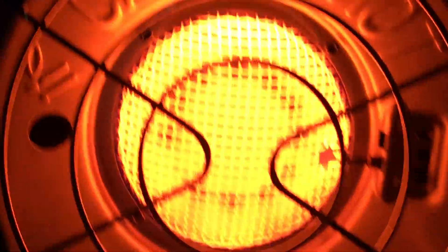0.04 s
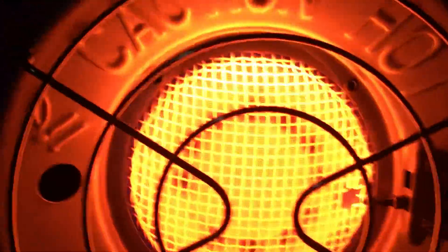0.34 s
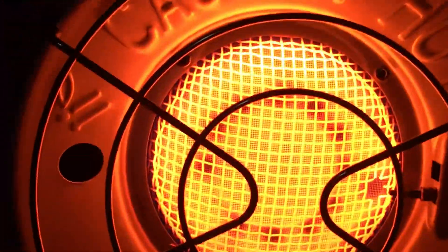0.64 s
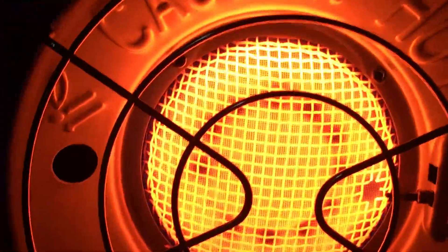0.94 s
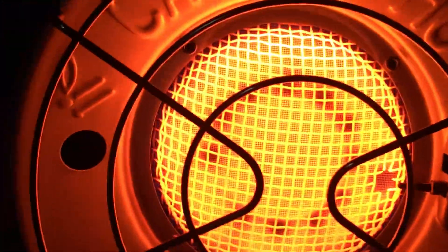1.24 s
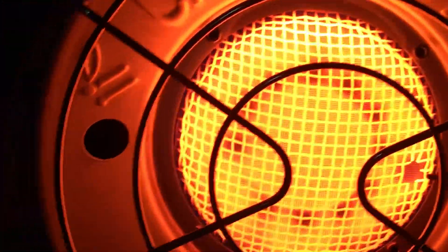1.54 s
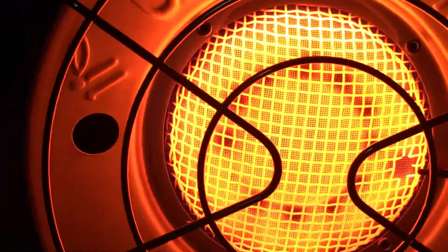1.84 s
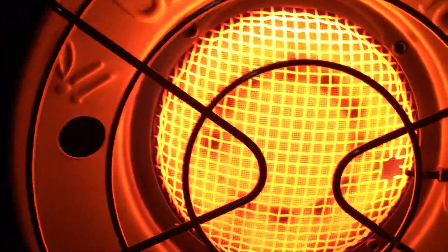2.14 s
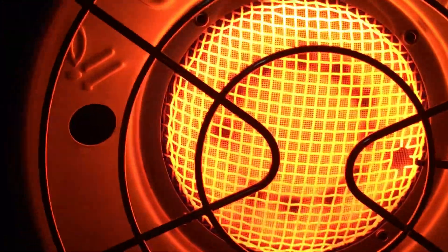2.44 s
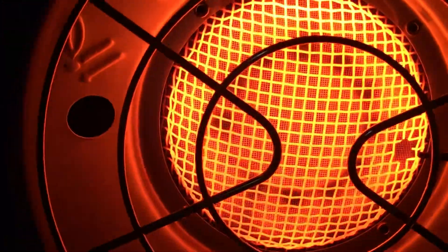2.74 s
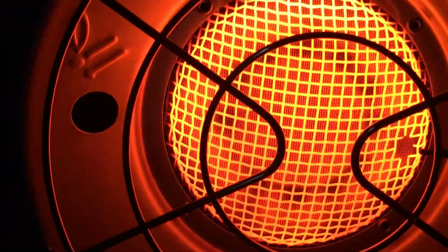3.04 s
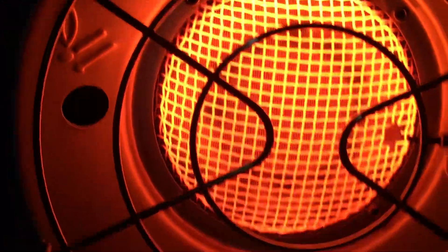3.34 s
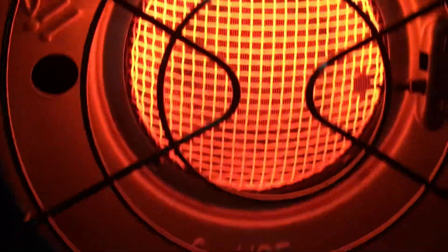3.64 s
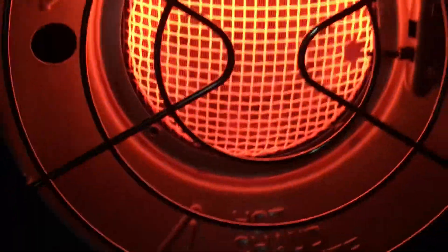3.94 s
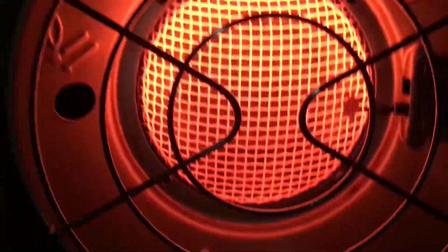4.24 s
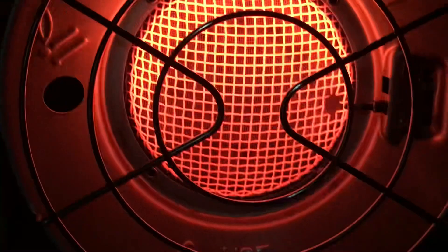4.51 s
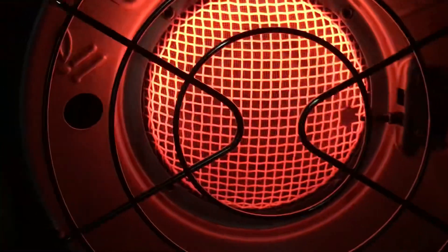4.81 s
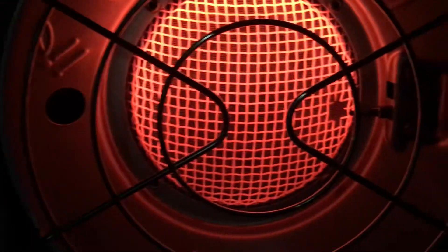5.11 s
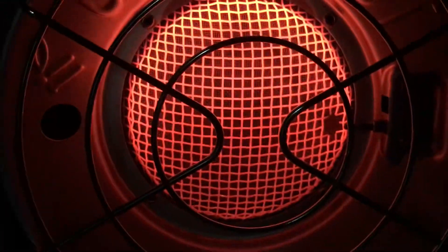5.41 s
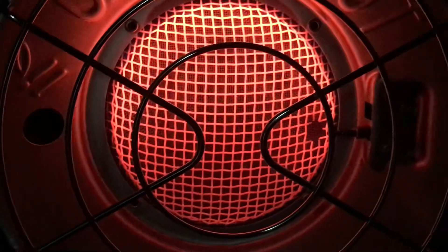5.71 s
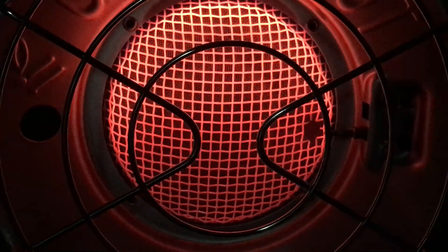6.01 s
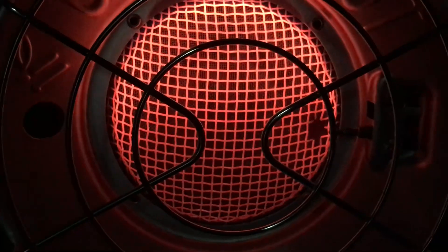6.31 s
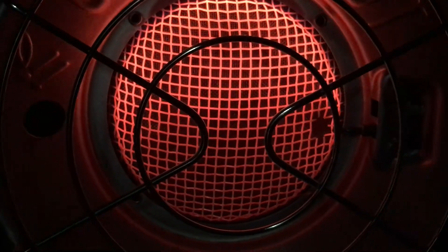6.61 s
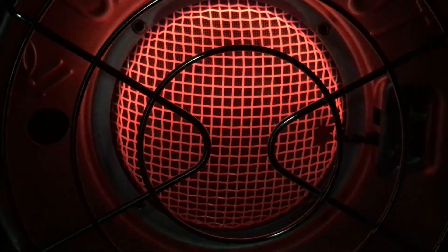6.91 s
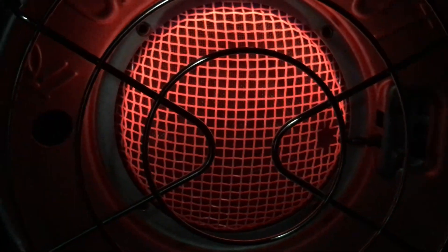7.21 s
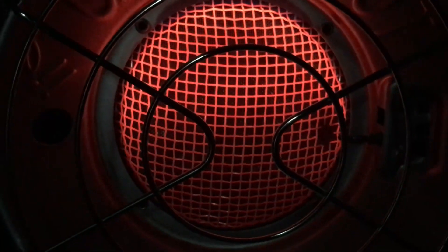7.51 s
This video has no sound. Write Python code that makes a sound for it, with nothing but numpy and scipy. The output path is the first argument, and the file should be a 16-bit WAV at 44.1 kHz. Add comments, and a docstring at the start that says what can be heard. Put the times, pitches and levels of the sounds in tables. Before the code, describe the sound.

A close gas heater burns steadily until a valve snaps shut; the flame flutters out, leaving irregular metallic ticks and crackles.

```python
"""A radiant propane heater, close to one microphone in a small room, burning and then shut off.
The flame roars and putters while the gas jet hisses in its mixing tube. The valve clicks shut, the gas
runs out and the flame flutters away. The hot mesh and reflector then shrink, slipping in ticks and
pings that ring the sheet metal. Behind the heater lie a low room hum and a faint distant rush."""
import sys
import numpy as np
from scipy import signal
from scipy.fft import rfft, irfft, next_fast_len
from scipy.io import wavfile

SR = 44100
rng = np.random.default_rng(int(sys.argv[2]) if len(sys.argv) > 2 else 0)


def output_pcm(signal):
    """Save a mono or channel-first signal as 16-bit PCM at the path in sys.argv[1].

    Samples are clipped to [-1, 1] before scaling.
    """
    pcm = np.clip(np.atleast_2d(signal).T, -1, 1) * 32767
    wavfile.write(sys.argv[1], SR, np.round(pcm).astype(np.int16))


N = 337806
TIME = np.arange(N) / SR
SHUT_S, FLAME_OUT_S = 2.165, 2.421  # the flame briefly outlives the closing of the valve


def undb(db):
    """Decibels to gain."""
    return 10 ** (np.asarray(db) / 20)


def since(s):
    """Seconds gone by since time s, 0 before it."""
    return np.maximum(TIME - s, 0)


def curve(table):
    """Rows of (t/s, value) joined at every sample."""
    return np.interp(TIME, *np.transpose(table))


def contour(points, hz):
    """Rows of (f/Hz, value) joined on a log-frequency axis."""
    at, value = np.transpose(points)
    return np.interp(np.log(np.maximum(hz, 1)), np.log(at), value)


def bins(size):
    """Frequencies in the spectrum of a sound of size samples."""
    return np.fft.rfftfreq(size, 1 / SR)


def resonance(hz, centre_hz, width_hz):
    """Magnitude response of one resonance, 1 at its centre."""
    return abs(1j * hz * width_hz / (centre_hz ** 2 - hz ** 2 + 1j * hz * width_hz))


def bumps(table, hz):
    """Rounded peaks and dips in dB from rows of (f/Hz, width/Hz, boost/dB)."""
    return sum(db * resonance(hz, f, width) ** 2 for f, width, db in table)


def unit(x):
    """Scale to rms 1."""
    return x / np.sqrt(np.mean(x ** 2))


def noise(response):
    """Steady noise of rms 1 with the given response over frequency."""
    size = next_fast_len(N, True)
    spectrum = rfft(rng.standard_normal(size)) * response(bins(size))
    return unit(irfft(spectrum, size)[:N])


def band(centre_hz, width_hz):
    """One band of noise, rms 1."""
    return noise(lambda hz: resonance(hz, centre_hz, width_hz) ** 2)


def walk(rate_hz):
    """Smooth random wandering with a spread near 1."""
    return noise(lambda hz: np.exp(-(hz / rate_hz) ** 2))


def bell(t, spread):
    """Gaussian swell, 1 at t = 0."""
    return np.exp(-.5 * (t / spread) ** 2)


def fade(t, t60):
    """Exponential decay, 60 dB down after t60."""
    return np.exp(-np.log(1000) * t / t60)


def colour(x, db):
    """Causal filter with the given dB per bin, so that attacks stay sharp."""
    cepstrum = irfft(np.log(undb(db)))
    cepstrum[1:len(x) // 2] *= 2
    cepstrum[len(x) // 2 + 1:] = 0
    return irfft(rfft(x) * np.exp(rfft(cepstrum)))


def add(out, s, sound):
    """Mix a sound in at time s."""
    start = max(int(s * SR), 0)
    part = sound[:max(N - start, 0)]
    out[start:start + len(part)] += part


def putter(rate_hz=23.47, jitter=.1, level_db=-34, scatter_db=1.9):
    """The flame pops at a loose beat until the valve shuts: rows of (t/s, relative level/dB)."""
    gap, strength = rng.standard_normal((64, 2)).T
    times = (np.cumsum(np.exp(jitter * gap)) - .5) / rate_hz
    return [(s, level_db + scatter_db * luck) for s, luck in zip(times, strength) if s < SHUT_S]


# the flame's roar from close by: f/Hz, relative level/dB
ROAR_SPECTRUM = [(40, -7), (100, 2.5), (140, 2), (185, -1), (320, 1.5), (480, -1.5), (780, -2.5),
                 (1050, -7.5), (2000, -14.5), (3000, -14), (6000, -48), (16000, -71)]
# cavity resonances of the burner bowl: f/Hz, width/Hz, boost/dB
BOWL_MODES = [(305, 25, 4), (385, 22, 5), (483, 22, 6), (583, 24, 5)]
# last gasps of the flame: t/s, relative level/dB
LAST_GASPS = [(2.415, -33), (2.435, -36), (2.496, -36)]
def flame(roar_db=-43.5, flicker_db=2, flare_db=3, flare_s=0.047, dying_db_per_s=86,
          pop_gain_db=2, pop_hz=620, pop_s=0.0011, edge_db=-15):
    """Turbulence roars in the bowl, flares and dies; pockets of gas ignite in short, crisp pops."""
    burn_db = flare_db * np.exp(-abs(TIME - FLAME_OUT_S) / flare_s) - dying_db_per_s * since(FLAME_OUT_S)
    out = noise(lambda hz: undb(contour(ROAR_SPECTRUM, hz) + bumps(BOWL_MODES, hz)))
    out *= undb(roar_db + burn_db + flicker_db * walk(96))
    t, pockets = np.arange(-256, 256) / SR, np.zeros(N)
    for s, db in LAST_GASPS + putter():
        pitch, length, phase = rng.standard_normal(3)
        pocket = undb(db + pop_gain_db) * bell(t, pop_s * np.exp(0.055 * length))
        pop = pocket * np.cos(2 * np.pi * pop_hz * np.exp(.12 * pitch) * t + phase)
        add(out, s + t[0], pop)
        add(pockets, s + t[0], pocket)
    crisp_edges = undb(edge_db) * pockets * band(centre_hz=1400, width_hz=2800)
    return out + crisp_edges


# broad hiss at the nozzle: f/Hz, relative level/dB
HISS_SPECTRUM = [(500, -11), (1100, -32), (1650, -13.5), (2050, -6), (2400, -15), (3300, -28), (3800, -14),
                 (5000, -29), (6200, -27.5), (7000, -23.5), (7700, -32), (8500, -21.5), (12000, -23),
                 (16000, -26)]
# resonances of the mixing tube: f/Hz, width/Hz, relative level/dB
TUBE_MODES = [(1388, 70, 5), (2780, 100, 3), (4130, 130, -7), (4330, 130, -7.5), (5650, 90, -17),
              (8885, 200, -12), (9210, 200, -12), (9920, 220, -16), (11000, 450, -20), (11560, 150, -15),
              (12700, 260, -14), (13520, 260, -16), (14000, 250, -17), (14820, 300, -17), (15450, 220, -17),
              (15700, 110, -15)]
def jet(hiss_db=-45, tube_db=1, flicker_db=1, bleed_db_per_s=90):
    """Gas from the nozzle blows the mixing tube; with the valve shut, pressure and hiss sink away."""
    def response(hz):
        tube_power = sum((undb(db + tube_db) * resonance(hz, f, width) * resonance(hz, f, 6 * width)) ** 2
                         for f, width, db in TUBE_MODES)
        return np.sqrt(tube_power + undb(contour(HISS_SPECTRUM, hz)) ** 2)
    return noise(response) * undb(hiss_db - bleed_db_per_s * since(SHUT_S) + flicker_db * walk(91))


# room tone behind the heater: f/Hz, relative level/dB
RUMBLE_SPECTRUM = [(20, -11), (35, -9), (56, -3.5), (80, -3.5), (125, 1.5), (180, -8.5), (250, -9),
                   (350, -18), (500, -23.5), (1000, -22), (2000, -29), (5000, -50), (16000, -51)]
# swells of the room's low boom: t/s, level/dB
BOOM_LEVELS = [(0, -50.5), (1.3, -53.5), (1.6, -58.5), (3.9, -57.5), (4.35, -52), (5.6, -55), (7.15, -54.5),
               (7.35, -50), (7.66, -51)]
# swells of the room's hum: t/s, relative level/dB
HUM_LEVELS = [(2.7, -56.5), (2.78, -66), (3.78, -54.5), (5.16, -63.5), (6.06, -49.5), (6.21, -64),
              (6.82, -49), (7.62, -60.5), (7.66, -60)]
def room(rumble_db=-54, hum_gain_db=-2, hum_hz=109, waver_hz=0.92):
    """The small room: low rumble, a swelling boom and a wavering hum."""
    rumble = noise(lambda hz: undb(contour(RUMBLE_SPECTRUM, hz))) * undb(rumble_db)
    boom = band(centre_hz=59, width_hz=20) * undb(curve(BOOM_LEVELS))
    hum_phase = 2 * np.pi * np.cumsum(hum_hz + waver_hz * walk(8.6)) / SR
    hum = np.sqrt(2) * np.sin(hum_phase) * undb(hum_gain_db + curve(HUM_LEVELS))
    return rumble + boom + hum


# a rush far from the microphone: f/Hz, relative level/dB
RUSH_SPECTRUM = [(100, -1), (250, 14), (340, -1.5), (600, 0.5), (1000, 1.5), (1700, -2.5), (2600, -14),
                 (6000, -26), (16000, -49)]
def distant_rush(far_db=-72, near_db=-60, nearest_s=6.86, rise_db_per_s=8):
    """A faint rush grows as it draws nearer, then holds its level."""
    level_db = np.maximum(far_db, near_db - rise_db_per_s * np.maximum(nearest_s - TIME, 0))
    return noise(lambda hz: undb(contour(RUSH_SPECTRUM, hz))) * undb(level_db)


def spot_colour(hz, ping_hz, low_db, snap_db):
    """Response in dB of one spot on the metal: each has its own low body, ping and treble snap."""
    tilt_db = contour([(1100, low_db), (1800, 0.5 * low_db), (2900, 0), (5500, 0), (8500, snap_db)], hz)
    ping_db = bumps([(ping_hz, 240, 5)], hz)
    ripple = np.interp(hz / 170, np.arange(256), rng.standard_normal(256))  # a peak or dip every 170 Hz
    depth_db = 3.2 * np.minimum(hz / 3500, 1)  # long waves depend less on the spot
    return tilt_db + ping_db + depth_db * ripple


# diffuse ring of the sheet metal and the room: f/Hz, t60/s, relative level/dB
TAIL_BANDS = [(800, 0.26, -6.5), (1620, 0.13, -2), (3980, 0.21, -10.5), (6840, 0.18, -13),
              (10600, 0.25, -29), (16000, 0.13, -25)]
def diffuse_tail(t):
    """A wash of noise rings on in metal and room, each band dying at its own rate."""
    wash, hz = rfft(rng.standard_normal(len(t))), bins(len(t))
    centres = [row[0] for row in TAIL_BANDS]
    return sum(irfft(wash * np.interp(hz, centres, share)) * undb(db) * fade(t, t60)
               for share, (_, t60, db) in zip(np.eye(len(centres)), TAIL_BANDS))


# ringing modes of the reflector: f/Hz, relative level/dB, t60/s
REFLECTOR_MODES = [(839, 1.5, 0.21), (1123, -5, 0.47), (1153, -11, 0.28), (1208, -9, 0.35),
                   (1423, -5.5, 0.43), (1810, -11, 0.2), (2196, 1.5, 0.15), (2427, -22, 0.14),
                   (2410, -9, 0.28), (3020, -28, 0.21), (3180, 6, 0.12), (3050, -4, 0.36),
                   (3770, -21, 0.053), (3730, -0.5, 0.24), (3520, -14, 0.1), (3860, 7.5, 0.16),
                   (4000, -21, 0.27), (3870, -9, 0.25), (4070, -5, 0.48), (4500, -9, 0.16), (4480, 1, 0.2),
                   (4530, -35, 0.1), (5110, 2, 0.15), (5710, -3.5, 0.31), (6760, 4.5, 0.14)]
def metal_click(body_db, ping_hz, low_db, snap_db, crack_t60, tail_db, ping_db,
                ring_db=None, rise_s=0.0011, peak_db=4.5, peak_t60=0.014):
    """Metal slips or is struck: a crack, a tail, a ping and, given ring_db, the reflector's modes."""
    size = 2 * (len(body_db) - 1)
    t, hz = np.arange(size) / SR, bins(size)
    # the first waves are strongest, before they spread through the sheet
    crack = rng.standard_normal(size) * (fade(t, crack_t60) + undb(peak_db) * fade(t, peak_t60))
    crack *= undb(np.repeat(rng.standard_normal(size // 16), 16))  # 1 dB of roughness
    tail = undb(tail_db) * diffuse_tail(t)
    spot_db = spot_colour(hz, ping_hz, low_db, snap_db)
    attack = 1 - np.exp(-t / rise_s)
    sound = colour((crack + tail) * attack, body_db + spot_db)
    sound += undb(ping_db) * fade(t, t60=0.088) * np.sin(2 * np.pi * ping_hz * t)
    if ring_db is not None:
        for f, db, t60 in REFLECTOR_MODES:
            luck, sign, shift = rng.standard_normal(3)
            gain = np.sign(sign) * undb(ring_db + db + np.interp(f, hz, spot_db) + 4.5 * np.tanh(luck))
            # high modes lie close together: each click wakes a slightly different one
            mode_hz = f * (1 + 0.0122 * shift * (f / REFLECTOR_MODES[-1][0]) ** 2)
            sound += gain * fade(t, t60) * np.sin(2 * np.pi * mode_hz * t)
    return sound


# response of the brass valve body: f/Hz, relative level/dB
VALVE_SPECTRUM = [(150, -14), (600, -2), (1000, 4.5), (1400, 1), (1900, 6), (2400, -3), (3300, 9.5),
                  (4300, -13), (6300, 1.5), (8000, -19), (16000, -31)]
# valve and knob contacts: t/s, relative level/dB, ping f/Hz, low body/dB, snap/dB, rise/s, crack t60/s
VALVE_CONTACTS = [(2.156, -33, 3270, -3, -11, 0.00015, .014), (2.156, -31, 3140, 6.5, 7, .0002, .016),
                  (2.159, -32.5, 6200, 4, -27, 0.00024, 0.023), (2.181, -46, 1410, 20, -7, 0.0027, 0.033),
                  (2.8488, -55.5, 1640, 19.5, -10, 0.0018, 0.068)]
def valve(gain_db=14):
    """Close to the microphone the valve snaps shut in a few quick contacts; a dull knock follows."""
    out, body_db = np.zeros(N), contour(VALVE_SPECTRUM, bins(size=16384))
    for s, db, ping_hz, low_db, snap_db, rise_s, crack_t60 in VALVE_CONTACTS:
        contact = metal_click(body_db, ping_hz, low_db, snap_db, crack_t60, tail_db=-14.5, ping_db=-36,
                              ring_db=-40, rise_s=rise_s, peak_db=-14, peak_t60=0.0012)
        add(out, s, undb(db + gain_db) * contact)
    return out


def flutter(level_db=-48, at_s=2.377, spread_s=0.039, rate_hz=105):
    """Starved of gas, the flame sinks onto the mesh and flutters in quick spits."""
    phase = 2 * np.pi * np.cumsum(rate_hz * np.exp(0.2055 * walk(44))) / SR
    pulses = unit(np.exp(0.92 * np.cos(phase)))
    spits = pulses * band(centre_hz=2400, width_hz=2200)
    return undb(level_db) * spits * bell(TIME - at_s, spread_s)


# broad response of reflector and mesh from close by: f/Hz, relative level/dB
SHELL_SPECTRUM = [(200, -42), (620, -19.5), (850, -14), (2000, -9), (2600, -4), (3600, -0.5), (4500, -1.5),
                  (5700, -5.5), (7600, -7), (9700, -1), (10500, -4), (16000, -5.5)]
# clusters and gaps among the reflector's modes: f/Hz, width/Hz, boost/dB
MODE_CLUSTERS = [(853, 88, 7.5), (1077, 125, 5.5), (1784, 33, 10.5), (2440, 125, 6), (2733, 60, -9),
                 (3795, 86, 6), (4360, 190, 5), (4990, 220, -4), (4700, 90, 1.5), (5770, 120, 6)]
def shell(size):
    """Response of mesh and reflector in dB, for a sound of size samples."""
    return contour(SHELL_SPECTRUM, bins(size)) + bumps(MODE_CLUSTERS, bins(size))


def crackle(count=240, from_s=2.38, for_s=5.3, thinning=1.3, level_db=-53.5, scatter_db=6,
            flurry_at_s=2.55, flurry_s=0.034, flurry_db=9.5, fade_from_s=5.73, fade_db_per_s=6.5):
    """Single wires of the cooling mesh slip and tinkle: a flurry, then rarer and at last fainter."""
    out, body_db = np.zeros(N), shell(size=4096)
    for k, (jitter, strength, pitch, snap) in enumerate(rng.random((count, 4))):
        s = from_s + for_s * ((k + 4 * jitter) / count) ** thinning
        db = level_db + scatter_db * (2 * strength - 1)
        db += flurry_db * bell(s - flurry_at_s, flurry_s)
        db -= fade_db_per_s * max(s - fade_from_s, 0)
        tinkle = metal_click(body_db, ping_hz=3500 + 3800 * pitch, low_db=-1.5, snap_db=5 * snap,
                             crack_t60=0.069, tail_db=4.5, ping_db=-8.5)
        add(out, s, undb(db) * tinkle)
    return out


# loud cooling ticks, close to the microphone: t/s, relative level/dB, ping f/Hz, low body/dB, snap/dB
COOLING_TICKS = [(2.409, -48.5, 2570, 14, -2), (2.511, -49, 4280, 5, -3), (2.5187, -43.5, 4330, 1, -5),
                 (2.633, -47.5, 3840, -1, 3), (2.661, -47, 3760, -5, 2), (2.6742, -41.5, 2930, 4.5, 6),
                 (2.7410, -46, 4230, -4, 1), (2.7815, -37.5, 3450, 3, -2.5), (2.8359, -44.5, 3600, 2, 7),
                 (2.8761, -41, 3750, 1, 0.5), (2.929, -47, 4250, -5, -4), (2.9717, -44, 3760, 5, -6.5),
                 (3.0573, -44.5, 3830, -2, -10), (3.0927, -42.5, 3920, -6, 0), (3.102, -42, 3830, 1, 0),
                 (3.1218, -42.5, 3690, 4, 1), (3.2298, -34.5, 3810, 3, -3.5), (3.3556, -49.5, 3960, 5, 3),
                 (3.3708, -41, 3810, 2, -0.5), (3.44, -38.5, 4300, -2, 0.5), (3.4525, -36.5, 4250, -4, -3),
                 (3.778, -37.5, 3120, -8, -2.5), (3.839, -41, 3760, 9, -4.5), (3.891, -46, 3800, -2, 3),
                 (3.9517, -44.5, 4500, -10, -2), (3.963, -47, 3720, -9, 4),
                 (4.1843, -41.5, 4780, -4.5, 0.5), (4.262, -48, 5600, -7, 0.5),
                 (4.311, -41.5, 3620, -2.5, 3), (4.4044, -46, 3660, 2, 2.5), (4.5953, -52, 4400, 10.5, -1),
                 (4.745, -46.5, 2390, 0, 1.5), (4.8463, -43, 3740, -1, -5), (4.8746, -37.5, 3400, -6, -0.5),
                 (4.95, -41, 4300, -9, 7.5), (5.107, -49.5, 6970, -15, 4.5),
                 (5.2566, -35.5, 4430, -12, 0.5), (5.5186, -49, 4720, -5, 6), (5.6453, -37, 4700, -5, -3),
                 (5.702, -46, 3400, -5, 0.5), (5.7874, -34, 3520, 0, -2), (5.9763, -31.5, 3880, -11, -4.5),
                 (6.0936, -48.5, 3760, -4, 3), (6.2723, -49, 3970, -3, 7.5),
                 (6.3725, -38.5, 2510, 7.5, -3.5), (6.5415, -42.5, 2530, -7, -8),
                 (6.962, -41.5, 3820, -6, -3.5), (7.026, -54.5, 3770, 1, -2), (7.0778, -35, 4540, 7, 0),
                 (7.4683, -33, 3740, -4.5, -3)]
def ticks(gain_db=9, creep_lead_s=.013, creep_db=-24, creep_scatter_db=4):
    """Shrinking metal sticks and slips at its joints, each time after a faint first creep."""
    out, body_db, creep_body_db = np.zeros(N), shell(size=16384), shell(size=4096)
    for s, db, ping_hz, low_db, snap_db in COOLING_TICKS:
        # the crack lasts longer as the metal cools, and is shorter the snappier it is
        crack_t60 = 0.055 * np.exp(0.12 * (s - FLAME_OUT_S) - 0.0072 * snap_db)
        tick = metal_click(body_db, ping_hz, low_db, snap_db, crack_t60,
                           tail_db=3, ping_db=-10.5, ring_db=-26)
        add(out, s, undb(db + gain_db) * tick)
        lead, luck = rng.standard_normal(2)
        creep = metal_click(creep_body_db, ping_hz, low_db, snap_db=4, crack_t60=0.028,
                            tail_db=-1, ping_db=-20, rise_s=0.0023)
        creep *= undb(db + gain_db + creep_db + creep_scatter_db * luck)
        add(out, s - creep_lead_s * np.exp(0.44 * lead), creep)
    return out


def sizzle(start_db=-65, fade_db_per_s=1, flicker_db=3, flicker_hz=45):
    """Once the flame is out, countless tiny slips blend into a sizzle that fades as the mesh cools."""
    level_db = start_db - fade_db_per_s * since(FLAME_OUT_S) + flicker_db * walk(flicker_hz)
    return noise(lambda hz: undb(contour(SHELL_SPECTRUM, hz))) * undb(level_db) * (TIME > FLAME_OUT_S)


def scene():
    """One microphone close to the heater, with the small room behind it."""
    heater = flame() + flutter() + jet() + valve() + ticks() + crackle() + sizzle()
    return (heater + room() + distant_rush())[None]


def record(dry, top_hz=15750):
    """The recorder cuts the top of the treble."""
    return signal.sosfilt(signal.ellip(10, .2, 70, top_hz, fs=SR, output="sos"), dry)


dry = scene()
out = record(dry)
output_pcm(out)
```